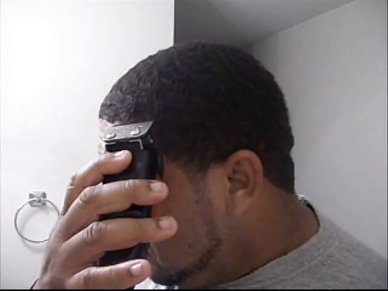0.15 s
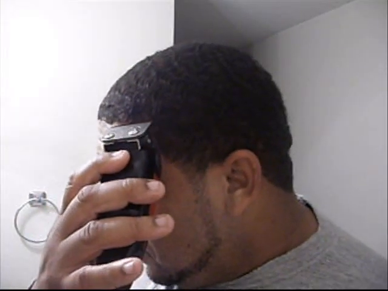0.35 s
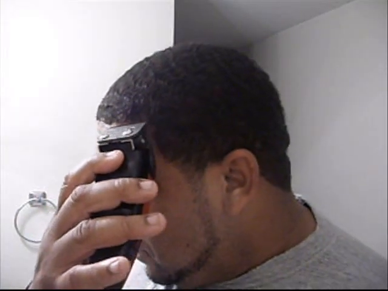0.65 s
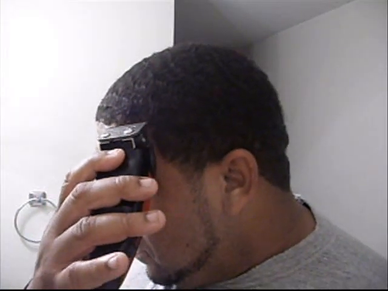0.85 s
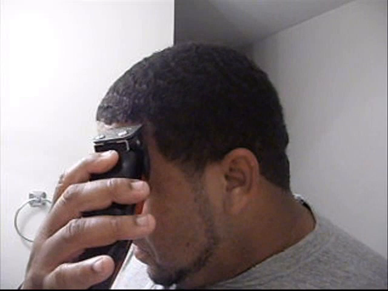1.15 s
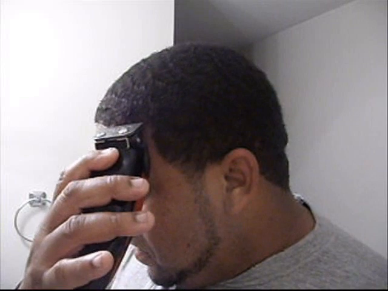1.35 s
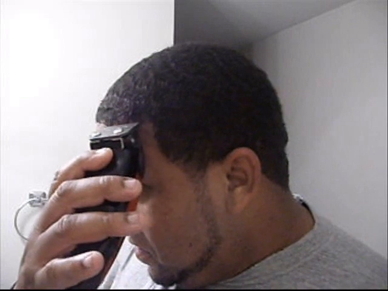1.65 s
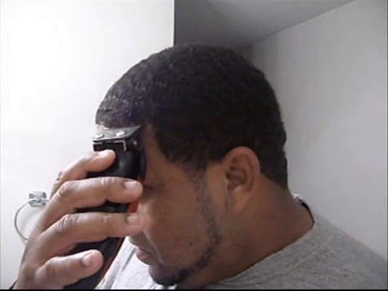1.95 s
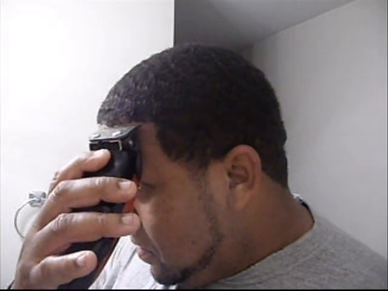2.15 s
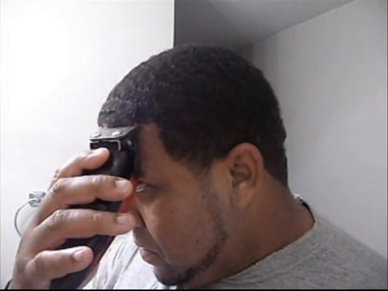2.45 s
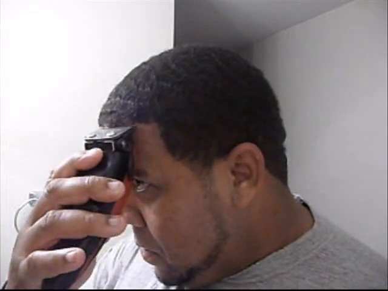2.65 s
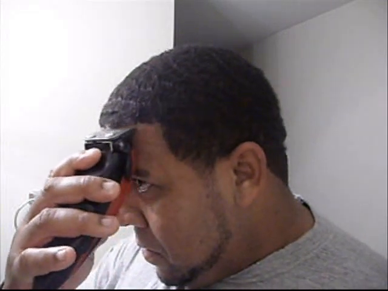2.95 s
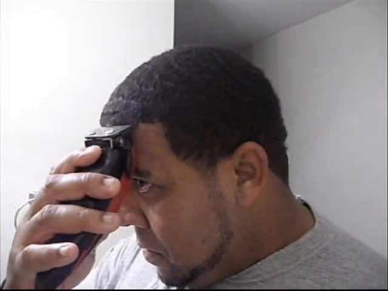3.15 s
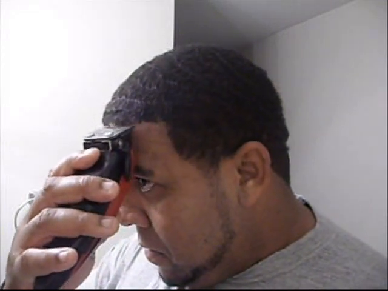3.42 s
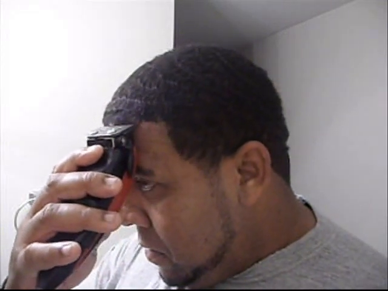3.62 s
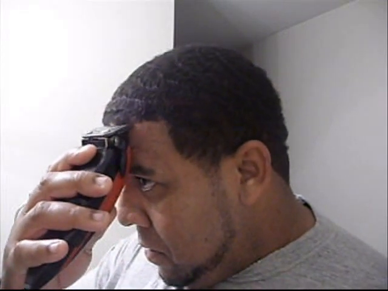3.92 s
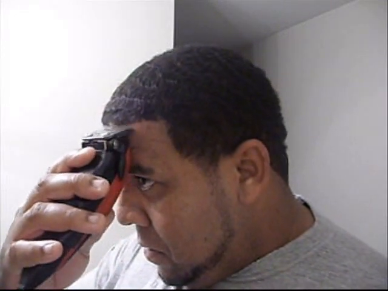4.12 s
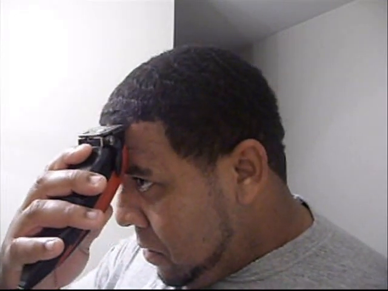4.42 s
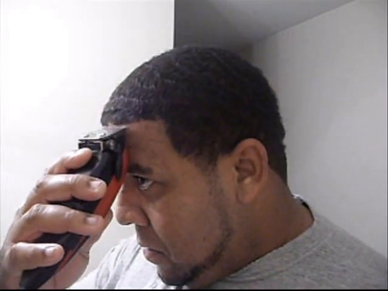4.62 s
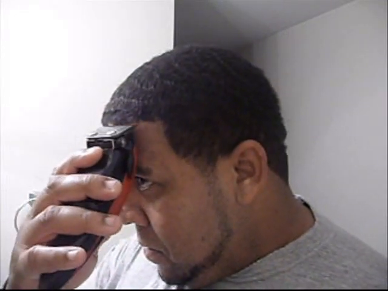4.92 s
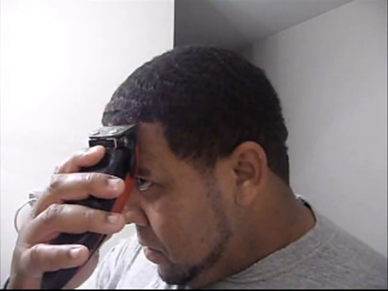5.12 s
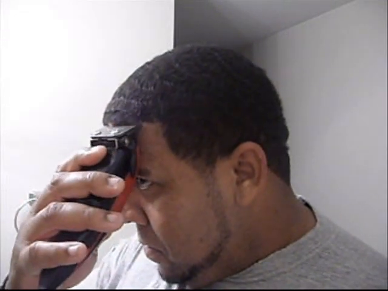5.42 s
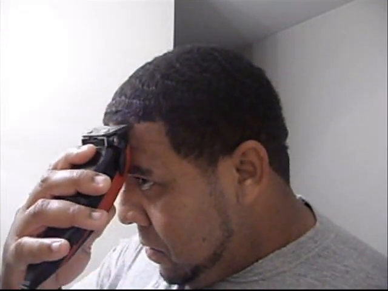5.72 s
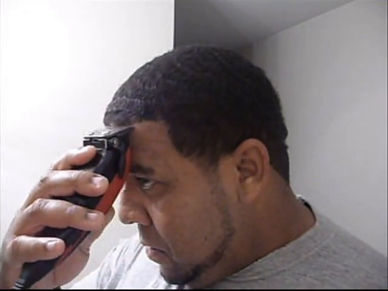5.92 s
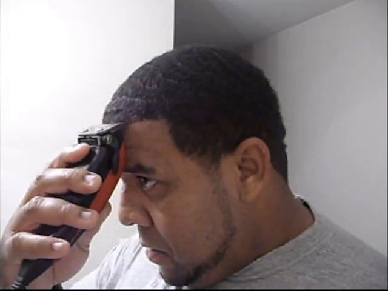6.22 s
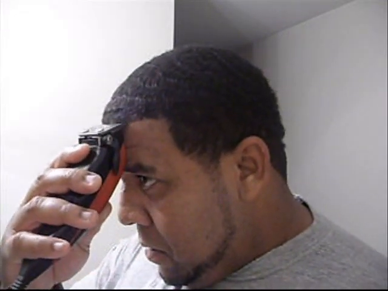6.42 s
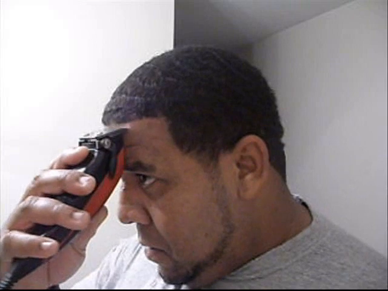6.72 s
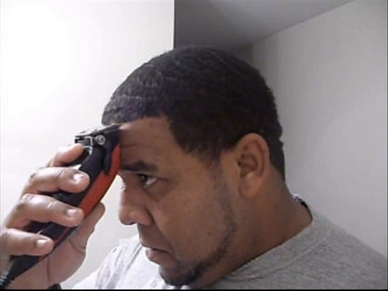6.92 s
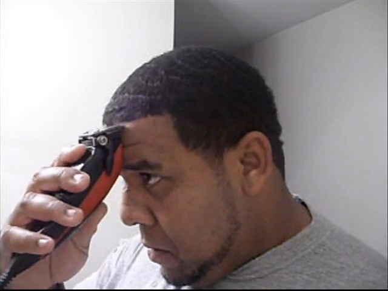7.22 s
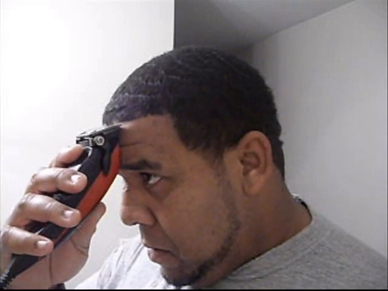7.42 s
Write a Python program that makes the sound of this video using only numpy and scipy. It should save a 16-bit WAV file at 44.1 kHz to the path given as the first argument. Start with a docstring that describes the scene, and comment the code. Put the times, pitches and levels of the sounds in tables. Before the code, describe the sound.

A steady low electric clipper buzz with gritty steel hiss, short rasps of snapping hair, tiny scrapes and a few faint blade ticks.

```python
"""Corded hair clippers edge a hairline in a small, hard-walled room, close to a cheap mono microphone.
Throughout, a magnetic motor swings the blade 120 times a second: the case hums and buzzes, the blades hiss.
Hairs snap in rasps from the start, fullest near 1.5 s; the teeth scrape from 1 s; the blade ticks near 3.1 s.
The rasp thins before 5 s; the blade ticks at 5.4 s, a whistling hiss glides up to 6.1 s, and rasps go on.
The recorder samples at a quarter rate and holds each value, which mirrors the sound into a gritty treble."""
import sys
import numpy as np
from scipy import signal
from scipy.fft import rfft, irfft, next_fast_len
from scipy.io import wavfile
from scipy.ndimage import uniform_filter1d, map_coordinates

SR = 44100
rng = np.random.default_rng(int(sys.argv[2]) if len(sys.argv) > 2 else 0)


def dump_mix(stems):
    """Bounce the given channels to the path in sys.argv[1] as a 16-bit WAV at rate SR."""
    frames = np.atleast_2d(stems).T  # one column per channel
    limited = np.clip(frames, -1, 1)  # hard clip at full scale
    pcm = np.round(limited * 32767).astype(np.int16)
    wavfile.write(sys.argv[1], SR, pcm)


N = 333837
TIME_S = np.arange(N) / SR
SLOW_S = TIME_S[::100]  # coarse times for the hand's movements

# broad spectrum of the room's rumble: freq_hz, density_db (relative)
ROOM_COLOUR = [(10, -24), (22, 4), (39, -13.5), (60, -6.5), (100, -11.5), (180, -12.5), (330, -14),
               (600, -12.5), (1500, -17.5), (5500, -35.5)]
# steel blade catches and ticks: start_s, peak_db, contact_s
TICKS = [(3.0505, -26, 0.0034), (3.08, -47, 0.0017), (3.135, -40, .002), (5.4274, -30, 0.0033)]
# ring of the blade: freq_hz, level_db (relative), t60_s
BLADE_MODES = [(3023, -7, 0.019), (3210, 2, 0.014), (3150, -5, 0.014)]
# whistling hiss as the teeth drag: time_s, centre_hz, level_db
DRAG = [(5.45, 3030, -73), (5.6, 3400, -57), (5.72, 3705, -57), (5.88, 3630, -56.5), (5.94, 3700, -65),
        (5.98, 3950, -51), (6.03, 3980, -54), (6.12, 4100, -79)]
# teeth dab and scrape on skin and stubble: middle_s, level_db, half_length_s, centre_hz
SCRAPES = [(1.079, -46.5, 0.025, 4600), (1.543, -55, 0.016, 1700), (2.118, -48, 0.016, 1810),
           (2.859, -49.5, 0.018, 1660), (2.865, -44, 0.018, 4600), (3.068, -45.5, 0.014, 1600),
           (3.355, -54, 0.016, 1720), (4.275, -53, 0.033, 3000), (5.13, -56, .02, 1650),
           (5.28, -51, 0.019, 1710), (6.015, -47, 0.014, 1510), (6.022, -47, 0.015, 4200),
           (6.229, -53, 0.013, 1700), (6.38, -54, .08, 4800), (6.798, -48, 0.018, 1720),
           (6.918, -49, 0.017, 1720), (7.03, -53, .02, 1700), (7.32, -56, 0.035, 3300)]
# resonances of case and blade set: centre_hz, width_hz, peak_db (before the ring share)
BODY_MODES = [(1310, 110, 2), (1606, 335, 8), (2043, 146, 7), (2245, 82, 6), (2686, 400, 5), (3360, 300, 2),
              (3876, 190, 3), (5160, 800, 9.5)]
# broad spectrum of sliding steel: freq_hz, density_db (relative)
SLIDE_COLOUR = [(150, -17), (350, -13), (520, -3.5), (800, -10.5), (1100, -1.5), (1450, -4.5), (1850, -2),
                (2500, 2), (3400, 0.5), (4500, 1.5), (5500, -3.5)]
# broad spectrum of snapping hair: freq_hz, density_db (relative)
RASP_COLOUR = [(200, -23), (450, -15), (650, -3.5), (900, -4), (1300, -0.5), (1850, -5.5), (2600, -1.5),
               (3400, 5), (4500, -2.5), (5500, -11)]
# hand strokes feed hair into the blades: full_bite_s, hold_s, level_db (before sag and rasp gain)
CUTS = [(.01, 0.056, -46), (.13, 0.17, -50), (0.534, 0.084, -46), (.69, 0.12, -47.5), (1.073, 0.09, -48.5),
        (1.531, 0.21, -43), (1.589, 0.026, -42), (2.096, 0.17, -46), (2.537, 0.098, -48),
        (2.838, 0.096, -42), (2.962, 0.11, -46.5), (3.167, 0.11, -51.5), (3.342, 0.086, -50.5),
        (3.468, 0.04, -48.5), (3.807, .06, -53), (4.136, .1, -53.5), (4.27, 0.056, -51.5),
        (4.815, .15, -60), (5.097, .06, -53), (5.265, 0.018, -53.5), (5.52, .07, -51.5),
        (5.637, 0.4, -51.5), (6.003, 0.057, -47), (6.1, .05, -56), (6.233, 0.13, -53.5),
        (6.41, 0.062, -51.5), (6.82, 0.22, -53.5), (7.288, 0.15, -49.5)]
# strong motor partials: stroke_rate_multiple, rms_db (before turn, press and waver)
HUM = [(1, -48), (2, -57), (5, -62), (7, -63.5), (9, -64.5), (11, -58), (12, -67), (13, -62.5), (14, -70.5),
       (15, -67.5), (17, -61), (18, -71), (19, -61), (22, -80)]
# clippers turn toward the microphone:
# time_s, partial_1_db, partial_5_db, partials_7_to_11_db, partial_17_db, partial_19_db
TURN = [(0, -0.7, 3.5, -5.5, -19, -0.5), (1.5, -1, 2.5, -5, 0.5, -0.5), (2.6, -0.1, 1.5, -2.5, 1, -0.5),
        (3, -0.1, 1.5, -1.5, 3, -0.5), (4.7, 0, -1.5, -2, -2.5, 4), (5.1, -0.5, 2, 0.5, -1.5, -3.5),
        (6.1, 0.7, 0, 0, -0.5, -4), (7.57, 1, -0.5, 0.5, -5, -14)]
# skin contact lifts or damps the case buzz: middle_s, half_length_s, lift_db, centre_hz
PRESSES = [(0.685, 0.074, 5.5, 1600), (1.185, 0.052, 7, 1520), (1.68, 0.037, 11, 1950),
           (2.118, 0.023, 9, 2100), (2.2, 0.05, 14.5, 1650), (2.61, 0.036, 6.5, 1750),
           (2.77, .025, -6, 1850), (2.87, 0.032, 11, 2100), (2.92, 0.054, 7.5, 1540),
           (3.0, 0.046, 11, 1080), (3.086, 0.036, 6, 2150), (3.35, .04, 7, 1740), (3.788, 0.044, 8, 1300),
           (4.19, 0.035, 9, 1500), (4.973, 0.044, 8.5, 1650), (5.107, .03, 9, 1780),
           (5.21, .035, -15, 2000), (5.3, .03, 10.5, 1950), (5.5, .05, 9, 2300), (5.66, .04, -8, 2050),
           (6.21, .05, 11, 1500), (6.39, .03, -10, 2200), (6.42, .05, 11, 1000), (6.564, .04, 3, 1700),
           (6.88, 0.047, 7, 1700), (6.98, .04, 5, 1080), (7.06, .03, 7, 1800), (7.28, 0.064, 9, 1550),
           (7.37, .07, 4, 1050), (7.487, 0.056, 8, 1800)]
# partials on case resonances: stroke_rate_multiple
CASE_PARTIALS = (9, 13, 14, 17, 19)

STROKE_HZ = 120.12
BITE_S, SAG_DB_PER_S, CLEAR_S = 0.054, 14, 0.045  # teeth enter the hair, thin it out, run clear
STRAY_DB, STRAY_WAVER_DB = -57, 1.0  # stray hairs between strokes, before rasp gain
REPEAT_SHARE = 0.23  # tough hairs struck again on the next swings, at full feed
PRESS_SPREAD_HZ = 370  # reach of a press to neighbouring partials
WAVER_DB = 0.5
FLUTTER_RAD, PRESS_RAD_PER_DB = 0.2, 0.07  # case partials flutter throughout; presses delay them
TOP_HZ = 15750


def undb(db):
    """Decibels to gain."""
    return np.exp(np.asarray(db) * (np.log(10) / 20))


def unit(x):
    """Scale to rms 1."""
    return x / np.sqrt(np.mean(x ** 2))


def curves(table):
    """Columns of a time table, joined by straight lines."""
    time_s, *columns = np.transpose(table)
    return [np.interp(TIME_S, time_s, column) for column in columns]


def walk(rate_hz):
    """Random levels held 1 / rate_hz and slewed twice; spread near 1."""
    hold = int(SR / rate_hz)
    steps = np.repeat(rng.standard_normal(N // hold + 1), hold)
    slewed = uniform_filter1d(uniform_filter1d(steps, hold), hold)
    return 1.3 * slewed[:N]


def colour(x, points, ring=0):
    """Filter by a broad spectrum, body resonances standing out by the share ring; rms 1."""
    size = next_fast_len(N, real=True)
    freq_hz = np.arange(size // 2 + 1) * SR / size
    point_hz, point_db = np.transpose(points)
    gain_db = np.interp(np.log(freq_hz + 1), np.log(point_hz), point_db)
    for centre_hz, width_hz, peak_db in BODY_MODES:
        gain_db += ring * peak_db / (1 + (2 * (freq_hz - centre_hz) / width_hz) ** 2)
    return unit(irfft(rfft(x, size) * undb(gain_db), size)[:N])


def grains(rate_hz, spread_db):
    """Random clicks of uneven size, rate_hz a second on average."""
    struck = rng.random(N) < rate_hz / SR
    return struck * rng.standard_normal(N) * undb(spread_db * rng.standard_normal(N))


def room_tone(db, mains_db):
    """Faint rumble and mains hum at half the stroke rate."""
    rumble = undb(db) * colour(rng.standard_normal(N), ROOM_COLOUR)
    mains = undb(mains_db) * np.sin(np.pi * STROKE_HZ * TIME_S)
    return rumble + mains


def walls(x, t60_s, wet_db):
    """Dense, decaying reflections from near, bare walls."""
    t = np.arange(SR // 2) / SR
    tail = rng.standard_normal(len(t)) * np.exp(-np.log(1000) * t / t60_s) * (t > 0.004)
    return x + undb(wet_db) * signal.fftconvolve(x, tail / np.linalg.norm(tail))[:N]


def ticks():
    """Each catch pushes the blade for a moment and lets it ring."""
    out = np.zeros(N)
    t = np.arange(SR // 10) / SR
    for start_s, peak_db, contact_s in TICKS:
        ring = sum(undb(level_db - 60 * t / t60_s) * np.sin(2 * np.pi * freq_hz * t)
                   for freq_hz, level_db, t60_s in BLADE_MODES)
        ring = ring * np.minimum(t / contact_s, 1)
        start = int(start_s * SR)
        out[start:start + len(t)] += undb(peak_db) * ring / np.abs(ring).max()
    return out


def drag(width_hz):
    """Friction noise in one narrow resonance that glides as the angle changes."""
    centre_hz, level_db = curves(DRAG)
    phase = 2 * np.pi * np.cumsum(centre_hz) / SR
    noise = walk(width_hz) * np.cos(phase) + walk(width_hz) * np.sin(phase)
    return undb(level_db) * unit(noise)


def scrapes(spread):
    """Short swells of friction noise, each in a band set by the angle of the teeth."""
    out = np.zeros(N)
    t = np.arange(-SR // 8, SR // 8) / SR
    for middle_s, level_db, half_length_s, centre_hz in SCRAPES:
        edges_hz = [centre_hz * np.exp(-spread), centre_hz * np.exp(spread)]
        band = signal.butter(2, edges_hz, "bandpass", fs=SR, output="sos")
        rub = unit(signal.sosfilt(band, rng.standard_normal(len(t))))
        swell = np.exp(-(t / half_length_s) ** 2 / 2)
        start = int((middle_s + t[0]) * SR)
        out[start:start + len(t)] += undb(level_db) * rub * swell
    return out


def blades(phase, depth, db):
    """Steel slides on steel, hissing most at mid-swing, twice a cycle, a little more on one swing."""
    speed = 1 + depth * np.cos(2 * phase) + 0.066 * np.cos(phase)
    hiss = colour(grains(20000, 3.2) * speed, SLIDE_COLOUR, ring=0.7)
    return undb(db + 0.48 * walk(12)) * hiss


def hair_fed():
    """Hair level in dB: each stroke bites quickly, sags as the hair thins, then dies away."""
    power = 0
    for full_bite_s, hold_s, level_db in CUTS:
        age_s = SLOW_S - full_bite_s
        bite = np.clip(1 + age_s / BITE_S, 0, 1)
        clear = np.exp(-np.maximum(age_s - hold_s, 0) / CLEAR_S)
        sagged_db = level_db - SAG_DB_PER_S * np.clip(age_s, 0, hold_s)
        power = power + (bite * clear * undb(sagged_db)) ** 2
    stray = undb(STRAY_DB + STRAY_WAVER_DB * walk(8))
    return 10 * np.log10(np.interp(TIME_S, SLOW_S, power) + stray ** 2)


def rasp(phase, cut_db, depth, gain_db):
    """Hairs snap as the teeth cross, more with more hair; snaps ring the body, repeated strikes buzz."""
    feed = undb(cut_db - cut_db.max())
    crossing = np.exp(depth * np.cos(2 * phase))
    snaps = grains(20000 * feed * crossing, 1.2) * np.sqrt(feed) * undb(0.77 * walk(60))
    period = round(SR / STROKE_HZ)
    again = REPEAT_SHARE * np.sqrt(feed)
    snaps = snaps + again * np.roll(snaps, period) + again ** 2 * np.roll(snaps, 2 * period)
    rms = undb(gain_db) * np.sqrt(np.mean(undb(cut_db) ** 2))
    return rms * colour(snaps, RASP_COLOUR, ring=1.4)


def chatter(phase, cut_db, db, slope_db, waver_db, load):
    """Blade knocks each stroke, harder when biting hair: a comb of faint, restless upper partials."""
    out = 0
    for k in range(20, 46):
        waver = walk(5)
        size = undb(db + slope_db * np.log2(k / 20) + waver_db * waver)
        out = out + size * np.cos(k * phase + rng.uniform(0, 2 * np.pi) + 0.5 * waver)
    return out * undb(load * np.maximum(cut_db - np.median(cut_db), 0))


def pressed(partial_hz):
    """Lift in dB of a partial: each press swells and fades, most for partials near its centre."""
    total_db = 0
    for middle_s, half_length_s, lift_db, centre_hz in PRESSES:
        time_off = (SLOW_S - middle_s) / half_length_s
        pitch_off = (partial_hz - centre_hz) / PRESS_SPREAD_HZ
        total_db = total_db + lift_db * np.exp(-(time_off ** 2 + pitch_off ** 2) / 2)
    return np.interp(TIME_S, SLOW_S, total_db)


def motor(phase):
    """Clean partials of the swinging armature; turning and pressing the case shifts their balance."""
    first, fifth, middle, seventeenth, nineteenth = curves(TURN)
    turn_db = {1: first, 5: fifth, 7: middle, 9: middle, 11: middle, 17: seventeenth, 19: nineteenth}
    out = 0
    for k, rms_db in HUM:
        k = round(k)
        level_db = rms_db + turn_db.get(k, 0) + WAVER_DB * walk(9.9)
        # as the hand moves, the paths to the microphone change, most for short waves
        lag_rad = rng.uniform(0, 2 * np.pi) + 0.066 * k * walk(1.99)
        if k in CASE_PARTIALS:
            press_db = pressed(k * STROKE_HZ)
            level_db = level_db + press_db
            lag_rad = lag_rad - PRESS_RAD_PER_DB * press_db + FLUTTER_RAD * walk(25)
        out = out + undb(level_db) * np.cos(k * phase + lag_rad)
    return np.sqrt(2) * out  # rms to peak


def scene():
    """The mains locks the stroke rate; its phase wanders slightly at random."""
    phase = 2 * np.pi * STROKE_HZ * TIME_S + 0.011 * walk(8.7)
    cut_db = hair_fed()
    room = room_tone(db=-55.0, mains_db=-72.0)
    steel = ticks() + drag(width_hz=260) + blades(phase, depth=0.038, db=-48.5)
    hair = scrapes(spread=0.38) + rasp(phase, cut_db, depth=0.18, gain_db=1.22)
    knocks = chatter(phase, cut_db, db=-71.3, slope_db=-7.0, waver_db=1.5, load=0.64)
    buzz = knocks + motor(phase)
    sound = room + walls(steel, t60_s=0.29, wet_db=-2.5) + walls(hair, t60_s=0.19, wet_db=-5) + buzz
    return np.tile(sound, (2, 1))


def record(dry):
    """Sample at a quarter rate on a slightly unsteady clock, hold each value four times, cut the top."""
    n = np.arange(N)
    slip = 0.7 * walk(14)  # in samples
    heard = map_coordinates(dry[0], [n + slip], mode="nearest")
    sampled = signal.resample_poly(heard, 1, 4, window=signal.firwin(41, 0.27))
    held = map_coordinates(np.repeat(sampled, 4), [n - slip], order=3, mode="nearest")
    held = held + undb(-72.5) * rng.standard_normal(N)  # faint white hiss
    top_cut = signal.ellip(12, 0.1, 80, TOP_HZ, fs=SR, output="sos")
    return np.tile(signal.sosfilt(top_cut, held), (2, 1))


dry = scene()
out = record(dry)
dump_mix(out)
```